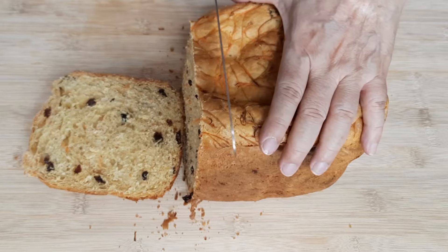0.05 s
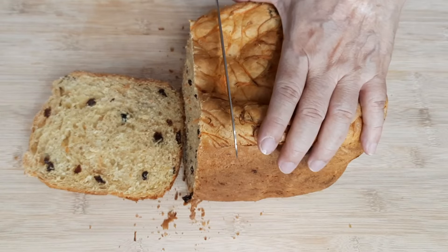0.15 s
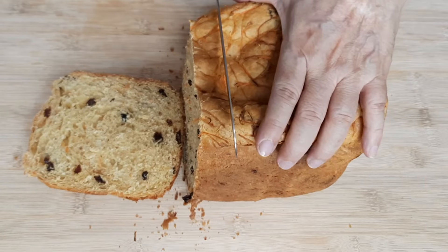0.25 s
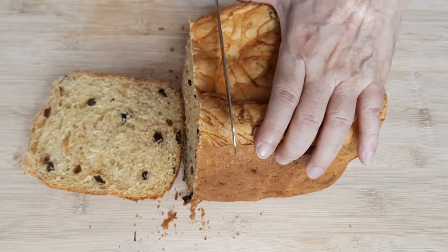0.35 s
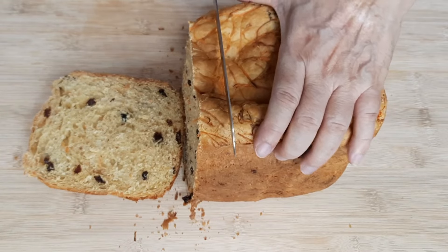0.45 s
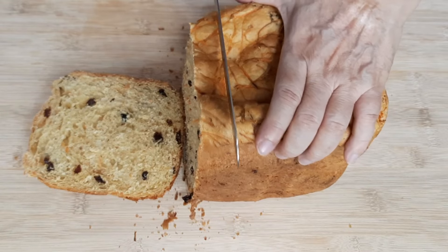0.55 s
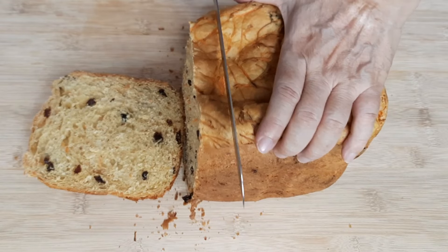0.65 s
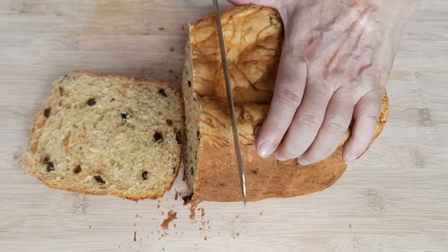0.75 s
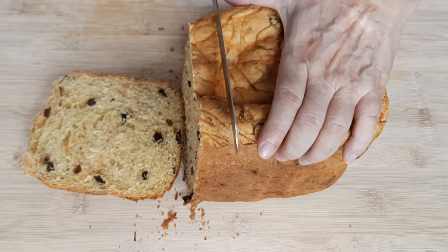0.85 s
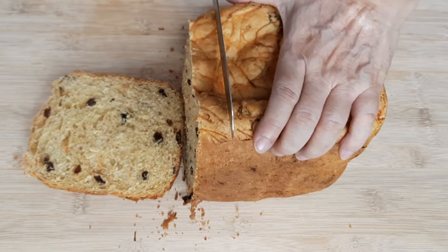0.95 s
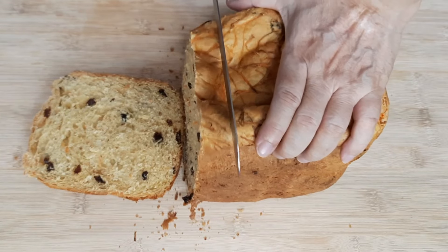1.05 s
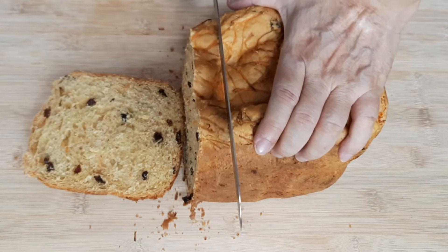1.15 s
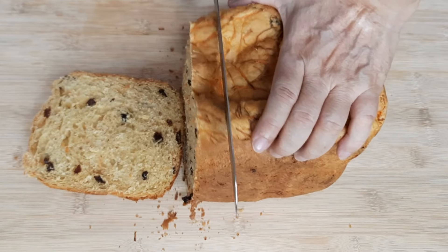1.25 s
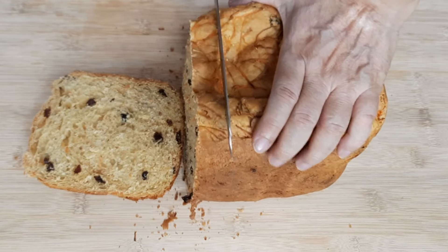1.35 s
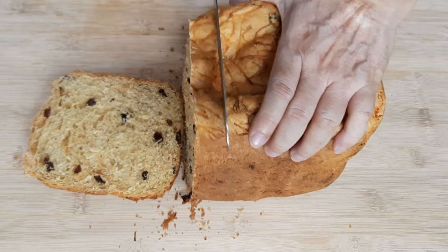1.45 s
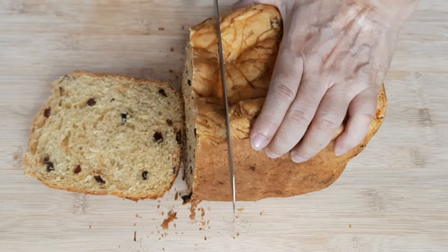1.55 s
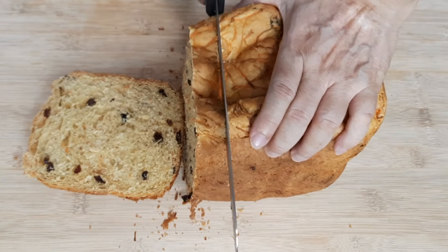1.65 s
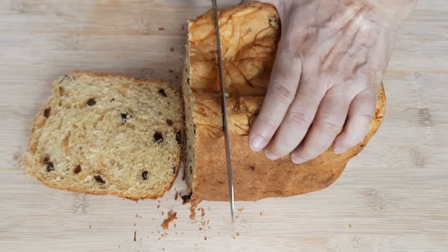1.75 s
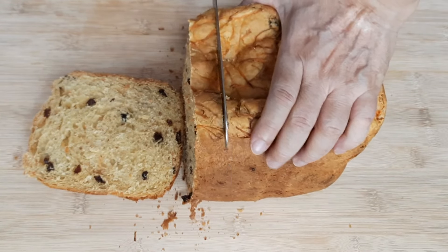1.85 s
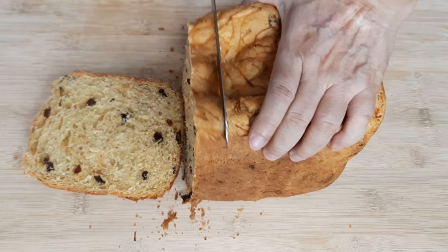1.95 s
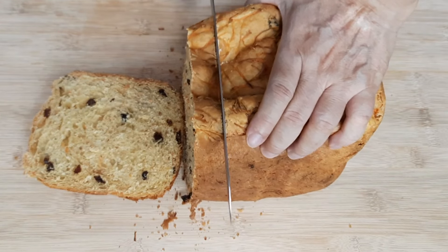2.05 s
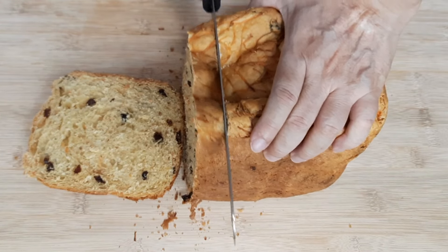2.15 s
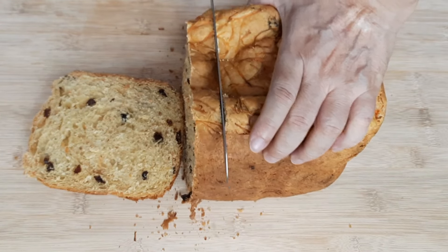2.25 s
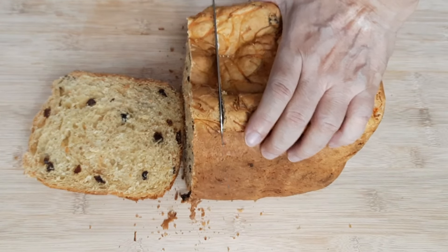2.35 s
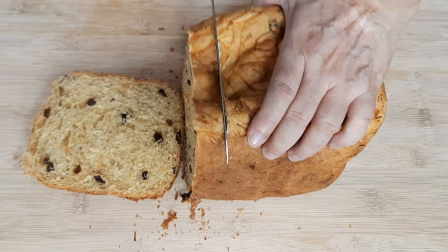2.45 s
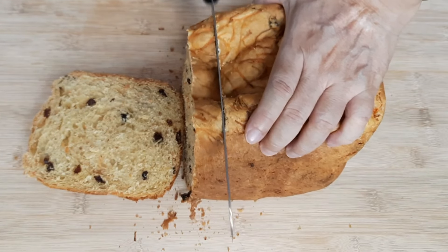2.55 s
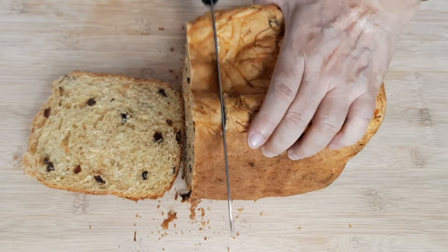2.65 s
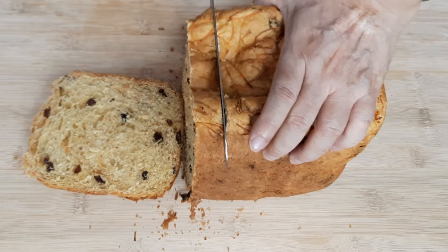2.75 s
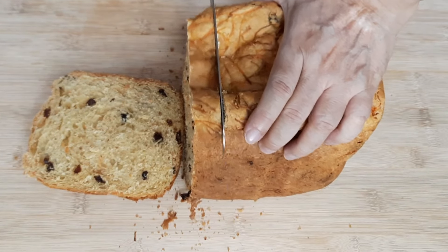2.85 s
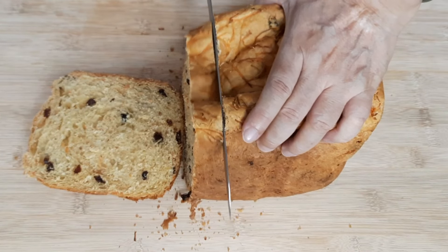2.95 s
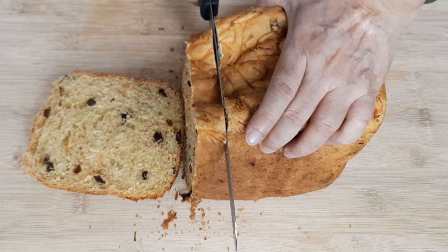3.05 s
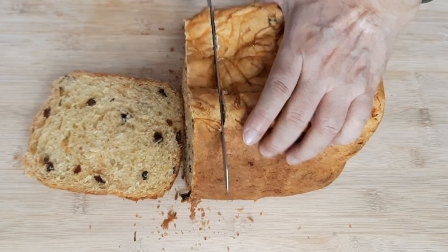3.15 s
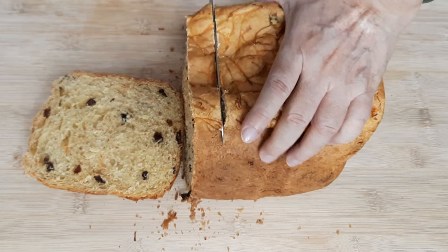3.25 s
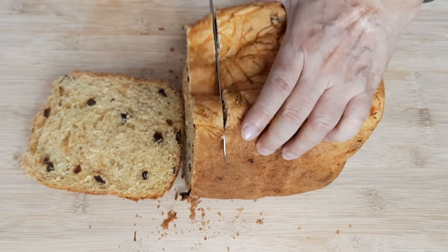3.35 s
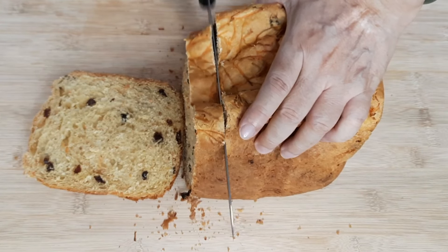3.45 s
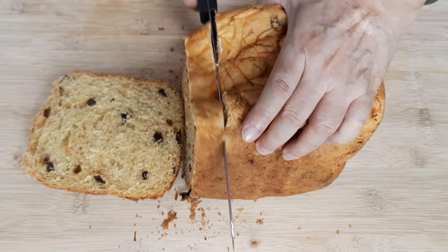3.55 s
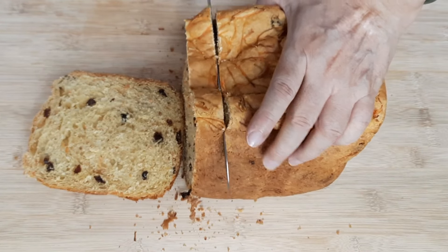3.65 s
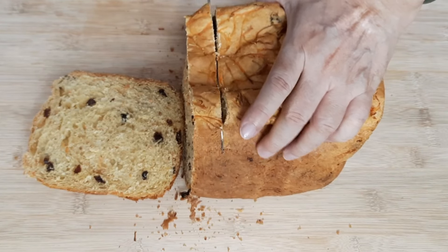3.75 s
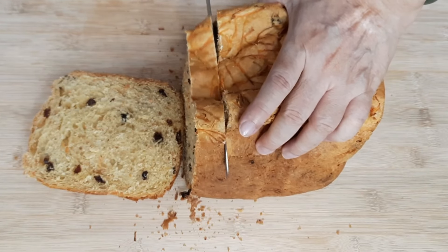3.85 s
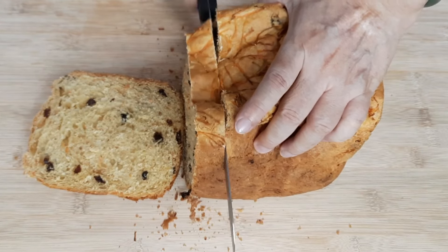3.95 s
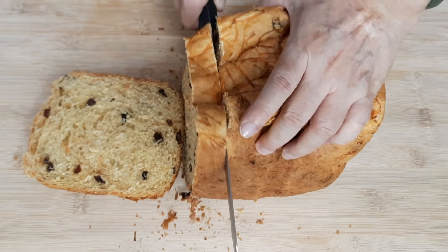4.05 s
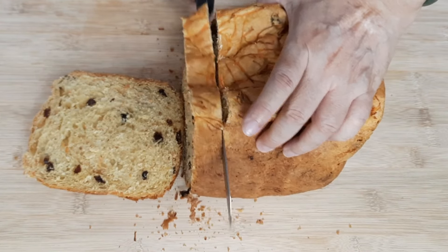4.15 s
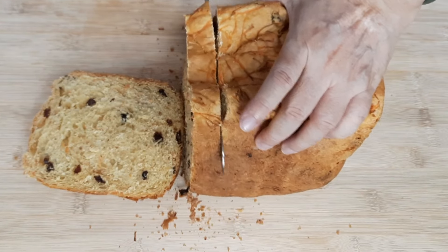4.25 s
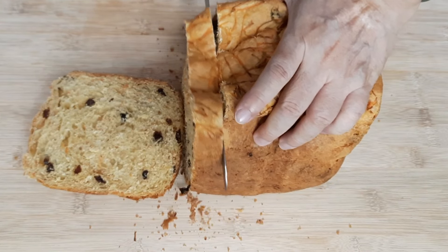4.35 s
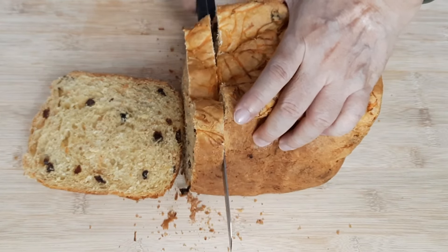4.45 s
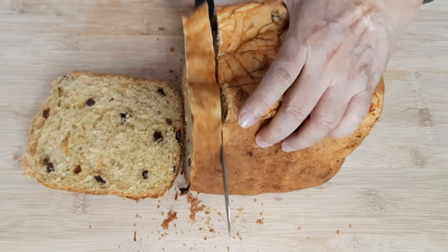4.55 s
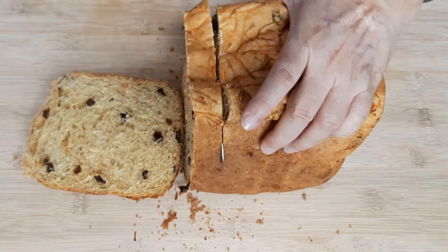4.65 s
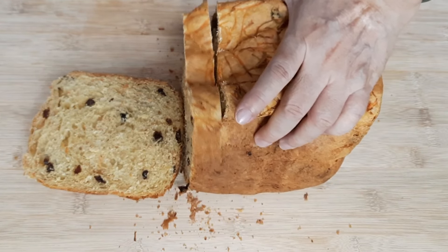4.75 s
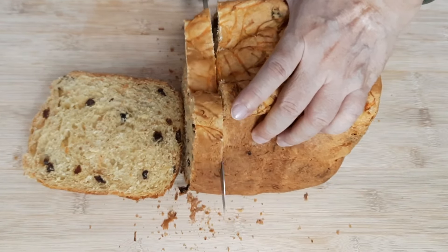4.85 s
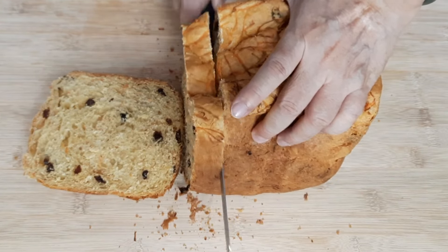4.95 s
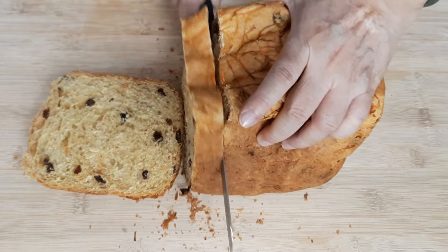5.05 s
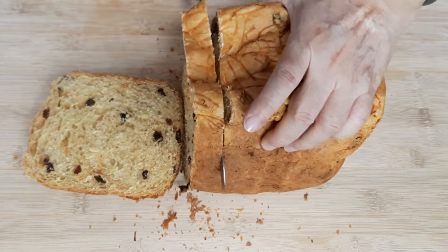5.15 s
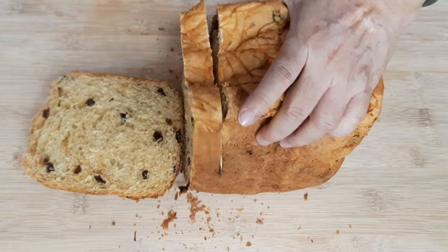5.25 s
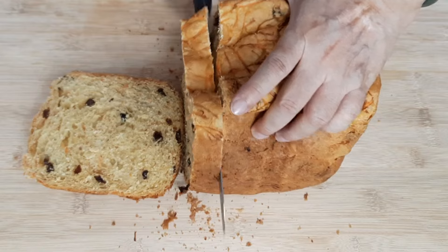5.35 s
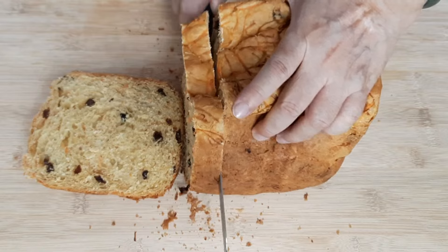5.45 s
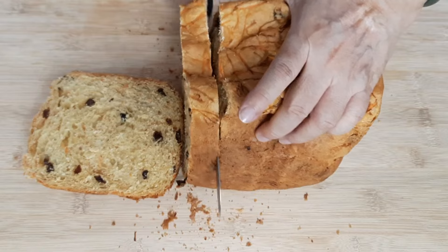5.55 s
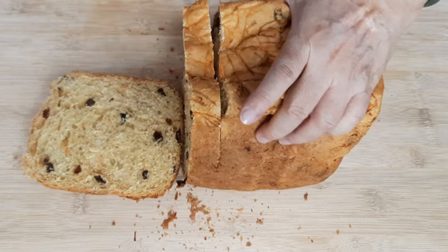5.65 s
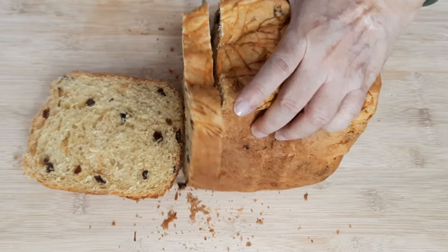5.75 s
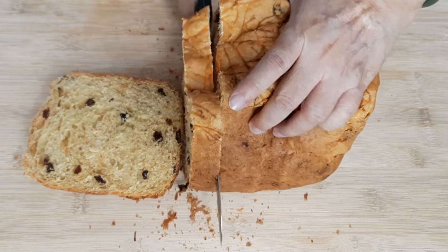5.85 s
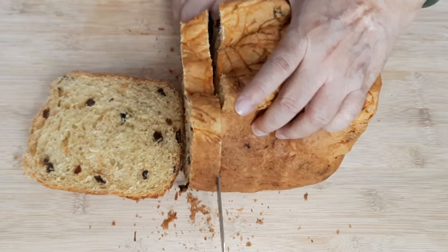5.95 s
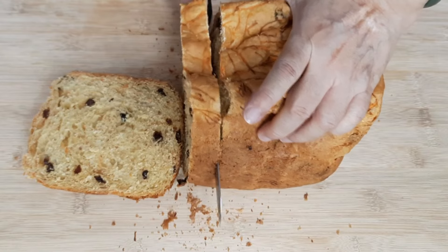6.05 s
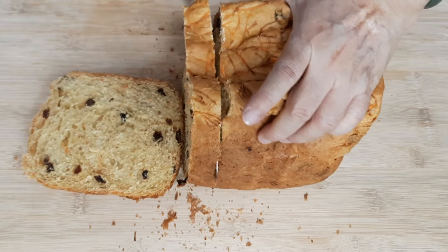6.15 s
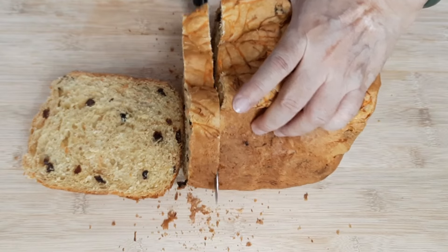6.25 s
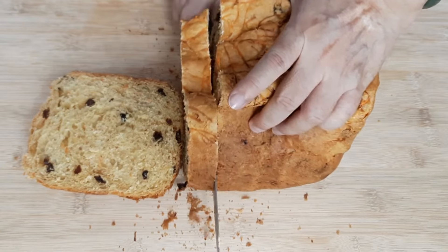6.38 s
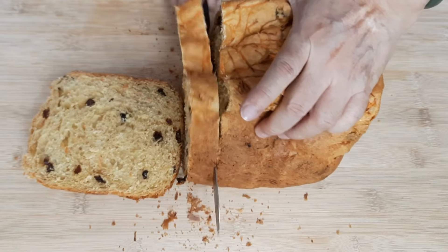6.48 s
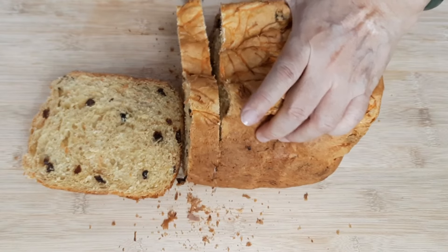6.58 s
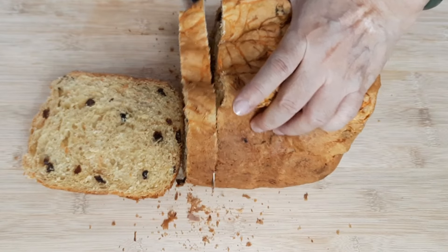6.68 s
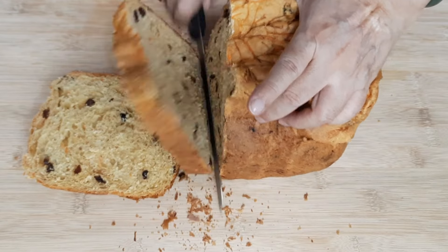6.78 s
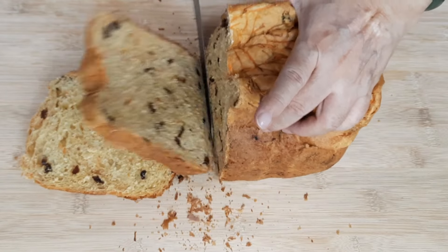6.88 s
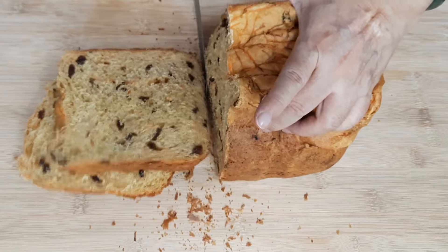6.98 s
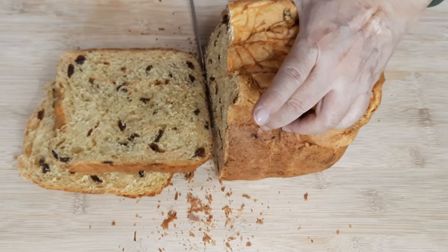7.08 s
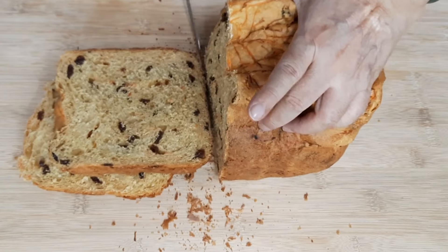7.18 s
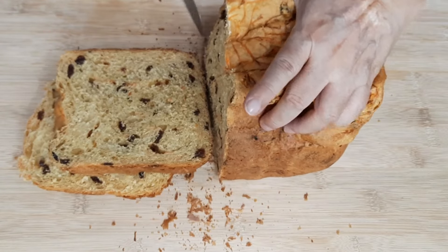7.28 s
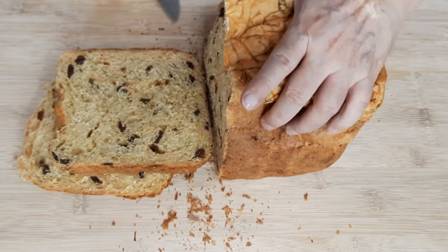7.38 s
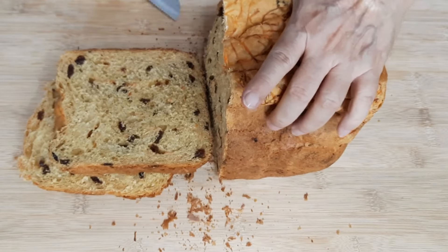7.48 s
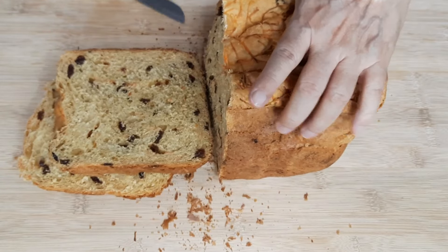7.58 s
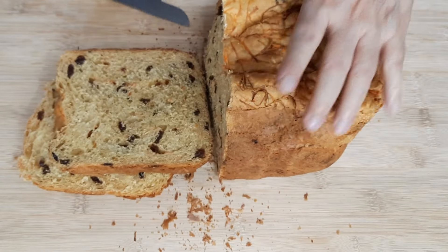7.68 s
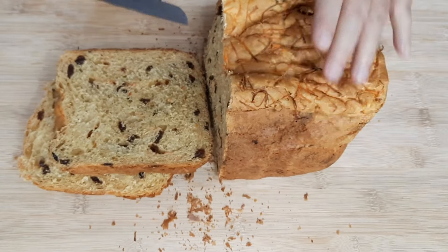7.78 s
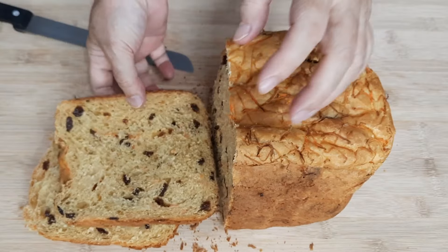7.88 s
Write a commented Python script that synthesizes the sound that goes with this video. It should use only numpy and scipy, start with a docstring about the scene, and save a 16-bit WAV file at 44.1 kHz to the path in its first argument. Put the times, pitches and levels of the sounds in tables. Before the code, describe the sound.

After a moment of dull room noise, quick push-and-pull sawing begins: throaty rasps, crumbly crackle, occasional sharp crust snaps and a low worktop rumble. It continues in uneven strokes for over six seconds, then breaks through with a hard, short scrape on wood and a lighter drag while the soft slice flops over. The knife clinks down, leaving quiet kitchen air. Close, slightly left of centre, with short reflections.

```python
"""A serrated knife saws back and forth through a crusty loaf on a wooden board in a small kitchen.
Each stroke swells and fades: random cracks and tooth bites make the rasp, crumb rubs on the blade, flakes snap.
Then the blade breaks through, its teeth rattle across the board and it is drawn out over the wood while
the slice sags and flops over; last, the knife is laid down. Noise bursts and filtered noise make every sound,
over a rumbling worktop, dull room noise and the reflections of the kitchen."""
import sys
import numpy as np
from scipy import signal
from scipy.fft import rfft, irfft
from scipy.io import wavfile
from scipy.ndimage import uniform_filter1d

SR = 44100
rng = np.random.default_rng(int(sys.argv[2]) if len(sys.argv) > 2 else 0)


def pcm_store(signal):
    """Save signal as 16-bit PCM."""
    levels = np.round(np.clip(np.atleast_2d(signal), -1, 1) * 32767)
    wavfile.write(sys.argv[1], SR, levels.astype(np.int16).T)


N = 349272
TIME = np.arange(N) / SR  # s

# All levels are relative; colours are levels per Hz. A resonance rises by its height, whatever the sign.

# saw strokes, push and pull in turn, each lasting until the next: turn t/s, fastest t/s, level/dB
STROKES = [(0.401, 0.48, -0.5), (0.615, 0.711, 0), (0.868, 0.95, -1.5), (1.135, 1.202, -7.5),
           (1.357, 1.447, 0.5), (1.593, 1.69, 1), (1.834, 1.935, 4), (2.053, 2.12, -1), (2.309, 2.41, 5.5),
           (2.51, 2.597, -3.5), (2.746, 2.828, 1), (2.972, 3.03, -10.5), (3.232, 3.309, 4.5),
           (3.454, 3.532, -3), (3.69, 3.801, 4.5), (3.977, 4.102, -1.5), (4.199, 4.291, 4.5),
           (4.427, 4.49, -2), (4.656, 4.746, 3), (4.91, 5.024, 4), (5.141, 5.264, -0.5),
           (5.371, 5.471, -1.5), (5.611, 5.72, 4), (5.879, 5.97, 0.5), (6.103, 6.207, 2),
           (6.319, 6.419, -3.5), (6.562, 6.648, 0.5)]
LAST_STROKE_END_S = 6.817
# every stroke starts at a bite level, swells to its own level and fades to an end level:
# bite level/dB, end level/dB, loaf thud level/dB, hiss level/dB
PUSH = (-8.5, -21, 0.5, 0.3)
PULL = (-11, -30, -1.5, 1.5)
# as the blade sinks, the teeth rasp more through the turn from push to pull; no change at mid-cut
SINK_DB_PER_S, MID_CUT_S = 1.3, 3.2
# from here on the teeth work in the dry bottom crust, which hisses on the push
BOTTOM_CRUST_S, BOTTOM_HISS_DB = 4.6, 6.8
# coupling of the cut to loaf and board as the blade sinks: t/s, loaf thud level/dB, board level/dB
COUPLING = [(0.48, -2, -5), (0.75, -9, -2), (1.42, 1.5, -1), (3.3, 2.5, -6), (4.25, -5, -5), (4.55, 3, 3.5),
            (5.27, 5, 7.5), (6.2, -0.5, 5.5), (6.65, -6.5, -1.5)]
# the teeth snag in hard crust, then work free: t/s, extra force level/dB
SNAGS = [(0.405, 4), (0.907, 3.5), (1.864, 6), (2.336, 3), (2.368, 3), (2.78, 3.5), (3.24, 13.5),
         (4.214, 4), (4.237, 7), (5.19, 1.5)]
SNAG_DECAY_S = 0.031
# colour of the cutting: f/Hz, level/dB
CUTTING_COLOUR = [(29, -32), (50, -23), (148, -6.5), (189, -2), (258, -5.5), (337, 0), (450, -5.5),
                  (646, -7.5), (884, -10.5), (1620, -11), (1820, -14.5), (5020, -21), (7760, -23.5),
                  (14200, -20.5), (16000, -30)]
# resonances of loaf and board under the saw: f/Hz, width/Hz, height/dB
LOAF_MODES = [(131, 25, 3.5), (192, 15, 4.5), (311, 57, 4.5), (600, 39, 0), (816, 20, -8.5)]
# the flat of the blade rubs in the crumb from first touch until it is drawn clear
RUB_START_S, RUB_END_S = 0.32, 7.23
# larger flakes of crust that snap off: t/s, crack level/dB, tick level against the crack/dB
SNAPS = [(0.4879, -25.5, 1.5), (0.9262, -26, -17), (1.865, -29.5, -12), (2.37, -21, -16),
         (2.4438, -12, -17), (2.7228, -50.5, 9), (2.7637, -24.5, -10), (2.785, -29, -2.5),
         (2.8106, -19, -21), (3.258, -26, -10), (3.317, -29, 0), (4.2143, -40.5, 0), (4.238, -26, -17),
         (4.4588, -28, -2), (4.655, -42, 2), (4.921, -35, -3.5), (5.1517, -36, -4), (5.38, -21.5, -15),
         (6.099, -39.5, 4), (6.346, -26, -12)]
# the slice sags on to the board and then flops over: t/s, level/dB
FLOP = [(6.87, 0), (7.066, -3.5)]
# teeth pressed hard on the board: start t/s, attack/s, release t/s, fall/(dB per s)
HARD_SCRAPE = (6.8185, .001, 6.88, 450)
# teeth drawn back lightly: start t/s, attack/s, release t/s, fall/(dB per s)
LIGHT_SCRAPE = (6.86, 0.05, 7.112, 750)
# colour of the teeth rattling hard on the board: f/Hz, level/dB
RATTLE_COLOUR = [(70, -48.5), (120, -26.5), (430, -3.5), (620, -6), (860, -2), (1000, -9), (1500, -8),
                 (2100, -10), (3400, -25.5), (7500, -34), (16000, -40)]
# ringing of the blade pressed on the board: f/Hz, width/Hz, height/dB
BLADE_MODES = [(470, 50, 3), (842, 12, 11), (880, 14, 9), (1268, 24, 7), (1378, 20, 6), (1578, 16, 6),
               (1680, 20, 4), (1828, 22, 7), (2260, 50, 3)]
# colour of the blade drawn lightly over the board: f/Hz, level/dB
DRAG_COLOUR = [(53, -65), (90, -33.5), (192, -12.5), (290, -13.5), (429, -1), (467, -10), (858, -17),
               (977, -17), (1320, -13), (3430, -31), (5070, -32), (16000, -45)]
# ringing of the board: f/Hz, width/Hz, height/dB
BOARD_MODES = [(438, 12, 1), (564, 16, 13), (567, 12, 9), (775, 11, 13.5), (960, 20, -1), (1091, 16, 11),
               (1190, 14, 8)]
# the knife is laid down and settles: t/s, knock level/dB, treble level against the knock/dB
SETTLE = [(7.399, -6, 4), (7.409, -3, 5), (7.42, -4.5, 1), (7.451, 1.5, -12), (7.461, -10, -13),
          (7.478, -5, -10), (7.497, -4.5, -18)]
# colour of those knocks: f/Hz, level/dB
KNOCK_COLOUR = [(100, -20), (180, -4), (330, 2), (600, -10), (900, -5), (1500, -10.5), (2500, -16.5),
                (6000, -18), (15000, -28)]
# ringing of the free knife: f/Hz, width/Hz, height/dB
KNIFE_MODES = [(848, 14, 10), (865, 18, 11), (1180, 24, 11), (1303, 16, 12.5), (1460, 16, 8),
               (1590, 22, 13.5), (2110, 36, 8), (3047, 12, 10)]
# the hands rest on the loaf and shake the worktop
WORK_START_S, WORK_END_S = 0.35, 7.2
# the hands lean hard on the board: t/s, level/dB
LEANS = [(5.71, -55), (6.7, -57)]
# colour of the steady kitchen background: f/Hz, level/dB
AMBIENCE_COLOUR = [(15, -50.5), (25, -24), (43, -10), (55, -18), (76, 0.5), (97, -6), (157, -3.5),
                   (249, -14), (317, -7.5), (394, -11), (818, -16), (1650, -34.5), (6210, -38),
                   (13600, -33.5), (16000, -44.5)]
ROOM_T60_S, ROOM_DB = 0.29, -4
RIGHT_LAG_SAMPLES = 2
CUTOFF_HZ = 16100


def sawing(cracks_per_s=1300, size_db=3.0, size_limit=3.8, crack_s=0.00068, catch_per_s=170, catch_db=1.5,
           crumble_db=-9, patchy_db=1.5, level_db=-46.0):
    """Teeth catch and let go unevenly while crust cells break at random, each a sub-millisecond crack."""
    speed_db, thud_db, board_db, hiss_db = stroke_controls()
    cutting = (TIME > STROKES[0][0]) & (TIME < LAST_STROKE_END_S)
    force = cutting * from_db(speed_db + catch_db * wander(catch_per_s))
    sizes = from_db(size_db * np.minimum(rng.exponential(1, N), size_limit))
    sizes = sizes * (rng.random(N) < cracks_per_s / SR)
    # crack energy dies at once, over a bed of finer crumbling
    energy = signal.lfilter([1], [1, -np.exp(-1 / (crack_s * SR))], sizes ** 2 + 1e-18)
    cracks = np.sqrt(energy / energy.mean() + from_db(crumble_db) ** 2)
    # low f/Hz, high f/Hz, stroke colour level/dB, stereo width: the soft loaf takes the lows, the crust the highs
    zones = [(39.5, 252, thud_db, .1), (222.5, 491, thud_db, .08), (452, 943, board_db, 0.37),
             (930, 2320, 0.0065, 0.2), (2070, 4660, hiss_db * 0.66, 0.68), (4590, 7480, hiss_db, 0.3),
             (10000, 21550, hiss_db, 0.7)]
    out = 0
    for low_hz, high_hz, colour_db, width in zones:
        # the colour shifts as the teeth pass harder and softer crust
        gain = force * from_db(colour_db + patchy_db * wander(25))
        out = out + band(cracks * gain * stereo_noise(width), low_hz, high_hz)
    return from_db(level_db) * body(out, CUTTING_COLOUR, LOAF_MODES)


def tooth_bites(teeth_per_s=125, jitter=.4, size_db=4.0, rasp_db=-22.8, thud_db=-28, count=1200):
    """Whole serrations tear through the crust one by one: a coarse, throaty rasp, each tooth jolting the loaf."""
    speed_db, thud_of_stroke_db, _, hiss_db = stroke_controls()
    gap, strength = np.clip(rng.standard_normal((count, 2)), -1.5, 1.5).T
    times = STROKES[0][0] + np.cumsum(np.exp(jitter * gap)) / teeth_per_s
    times = times[times < LAST_STROKE_END_S]
    bites = bursts(times, from_db(size_db * strength), decay_s=.0002, width=.5)
    bites = bites * from_db(speed_db)
    # crust that crumbles into fine hiss gives weaker coarse bites
    rasp = band(bites * from_db(-.5 * hiss_db), 990, 2550)
    jolt = band(bites * from_db(thud_of_stroke_db), 170, 310)
    return from_db(rasp_db) * rasp + from_db(thud_db) * jolt


def stroke_controls(bite_s=0.007, push_stall_db=20, pull_stall_db=8):
    """Levels in dB for blade speed (low at each turn, highest mid-stroke), loaf thud, board and hiss."""
    k, pushing, before, past = stroke_phase()
    turn, _, level_db = np.array(STROKES)[k].T
    bite_db, end_db, thud_db, hiss_db = np.where(pushing[:, None], PUSH, PULL).T
    speed_db = level_db + (bite_db - level_db) * before + (end_db - level_db) * past
    near_turn = np.where(pushing, past, before / 2)
    speed_db = speed_db + SINK_DB_PER_S * (TIME - MID_CUT_S) * near_turn
    # the teeth take a moment to bite
    stall_db = np.where(pushing, push_stall_db, pull_stall_db)
    speed_db = speed_db - stall_db * np.exp(-np.abs(TIME - turn) / bite_s)
    for s, extra_db in SNAGS:
        speed_db = speed_db + extra_db * (TIME > s) * np.exp(-np.abs(TIME - s) / SNAG_DECAY_S)
    loaf_db, board_db = in_time(COUPLING)
    hiss_db = hiss_db + BOTTOM_HISS_DB * pushing * (TIME > BOTTOM_CRUST_S)
    return speed_db, thud_db + loaf_db, board_db, hiss_db


def stroke_phase():
    """At every sample: stroke number, whether it is a push, how far before and past its fastest moment (0-1)."""
    turn, fastest, _ = np.transpose(STROKES)
    end = np.append(turn[1:], LAST_STROKE_END_S)
    k = np.clip(np.searchsorted(turn, TIME) - 1, 0, len(turn) - 1)
    before = np.clip((fastest[k] - TIME) / (fastest - turn)[k], 0, 1)
    past = np.clip((TIME - fastest[k]) / (end - fastest)[k], 0, 1)
    return k, k % 2 == 0, np.sin(np.pi / 2 * before) ** 2, np.sin(np.pi / 2 * past) ** 2


def rubbing(push_db=-70, pull_db=-63, clear_db=-60, turn_dip_db=12, turn_s=.022, fall_db_per_s=55,
            stick_db=1.5, top_hz=1800):
    """Crumb clings to the blade and slips: dull, uneven friction, stronger on pull than push, dipping at turns."""
    _, pushing, _, _ = stroke_phase()
    cutting = (TIME > STROKES[0][0]) & (TIME < LAST_STROKE_END_S)
    level_db = np.where(cutting, np.where(pushing, push_db, pull_db), clear_db).astype(float)
    level_db = uniform_filter1d(level_db, size=2205)  # glide over 50 ms
    from_turn_s = np.min([np.abs(TIME - turn) for turn, _, _ in STROKES[1:]], axis=0)
    level_db = level_db - turn_dip_db * np.exp(-(from_turn_s / turn_s) ** 2 / 2)
    friction = stereo_noise(width=0.26) * from_db(level_db + stick_db * wander(120))
    friction = friction * envelope(RUB_START_S, 0.063, RUB_END_S, fall_db_per_s)
    return band(body(friction, CUTTING_COLOUR, LOAF_MODES), 130, top_hz)


def snaps(level_db=6, bright_db=5, thud_db=3):
    """A flake breaks with a sharp crack and a fine tick, and jolts the loaf."""
    s, crack_db, tick_db = np.transpose(SNAPS)
    crack = bursts(s, from_db(crack_db), decay_s=.0004, width=.25)
    tick = bursts(s, from_db(crack_db + tick_db + bright_db), decay_s=.001, width=.7)
    jolt = from_db(thud_db) * band(crack, 200, 460)
    return from_db(level_db) * (band(crack, 580, 3600) + band(tick, 7100, 21000) + jolt)


def slice_flop(level_db=-17, fade_s=0.02):
    """Soft bread lands with a dull puff of low noise that swells and fades."""
    landing = sum(from_db(db) * np.exp(-np.abs(TIME - s) / fade_s) for s, db in FLOP)
    return from_db(level_db) * band(stereo_noise(width=.1) * landing, 160, 300)


def blade_on_board(rattle_db=-25.5, drag_db=-36.8, easing_db_per_s=20):
    """Pressed hard, the teeth make the blade ring; drawn back ever more lightly, they mostly sound the board."""
    rattle = teeth_on_wood(HARD_SCRAPE, teeth_per_s=450, jitter=.25, size_db=1.0, grit_db=-12)
    drag = teeth_on_wood(LIGHT_SCRAPE, teeth_per_s=220, jitter=.45, size_db=3.0, grit_db=-9)
    drag = drag * from_db(-easing_db_per_s * np.maximum(TIME - LIGHT_SCRAPE[0], 0))
    rattle = from_db(rattle_db) * body(rattle, RATTLE_COLOUR, BLADE_MODES)
    return rattle + from_db(drag_db) * body(drag, DRAG_COLOUR, BOARD_MODES)


def teeth_on_wood(scrape, teeth_per_s, jitter, size_db, grit_db, hiss_db=1.2, count=120):
    """The serrations hop over the wood one after another, with grit in between."""
    gap, strength = np.clip(rng.standard_normal((count, 2)), -1.5, 1.5).T
    gaps = np.exp(jitter * gap)
    times = scrape[0] + (np.cumsum(gaps) - gaps[0]) / teeth_per_s
    hops = bursts(times, from_db(size_db * strength), decay_s=.0006, width=.6)
    # wood is too soft for sharp clicks: above the knock of each hop there is only a smooth hiss
    knocks = band(hops, 300, 3230) * np.sqrt(SR / teeth_per_s)
    hiss = from_db(hiss_db) * band(stereo_noise(width=0.57), 3200, 19000)
    grit = from_db(grit_db) * stereo_noise(width=0.43)
    return (knocks + hiss + grit) * envelope(*scrape)


def knife_down(level_db=-21, slide_db=-30):
    """Handle and blade touch down, slide a little and bounce to rest, ringing freely."""
    s, knock_db, treble_db = np.transpose(SETTLE)
    knocks = bursts(s, from_db(knock_db), decay_s=0.00042, width=.6)
    clinks = bursts(s, from_db(knock_db + treble_db), decay_s=0.0024, width=0.65)
    touches = band(knocks, 100, 2500) + band(clinks, 2900, 16000)
    sliding = (TIME > s[0]) * (TIME < s[-1])
    slide = from_db(slide_db) * band(stereo_noise(width=0.93), 140, 3800) * sliding
    return from_db(level_db) * body(touches + slide, KNOCK_COLOUR, KNIFE_MODES)


def worktop(resting_db=-68, stroke_db=-68, lean_s=0.093, fall_db_per_s=25):
    """The worktop rumbles under the hands: a little all through, more with each stroke and each lean."""
    speed_db, thud_db, _, _ = stroke_controls()
    load = from_db(resting_db) + from_db(stroke_db + speed_db + thud_db)
    load = load + sum(from_db(db) * np.exp(-np.abs(TIME - s) / lean_s) for s, db in LEANS)
    rumble = rms_one(band(stereo_noise(width=0.22), 47, 122))
    return rumble * load * envelope(WORK_START_S, .1, WORK_END_S, fall_db_per_s)


def background(level_db=-65.0, width=0.52):
    """Steady dull room noise with a faint whine: noise through a fixed colour and three resonances."""
    modes = [(64.5, 6.9, 3.7), (312, 31, 10), (3070, 35, 10)]  # f/Hz, width/Hz, height/dB
    return from_db(level_db) * body(stereo_noise(width), AMBIENCE_COLOUR, modes)


def kitchen(x, bass_hz=600, size=22050):
    """Dense reflections from worktop and walls; both microphones hear the same bass."""
    t = np.arange(size) / SR
    tail = rng.standard_normal((2, size)) * from_db(-60 * t / ROOM_T60_S) * (t > .003)
    side = signal.lfilter(*signal.butter(2, bass_hz, "high", fs=SR), tail[1])
    response = np.array([tail[0] + side, tail[0] - side])
    return signal.oaconvolve(x, response / np.linalg.norm(response[0]), axes=1)[:, :N]


def placed(x, left_db):
    """A source left of centre is louder on the left and reaches that side first."""
    return np.array([x[0] * from_db(left_db / 2), np.roll(x[1], RIGHT_LAG_SAMPLES) * from_db(-left_db / 2)])


def body(x, colour, modes=(), size=8192):
    """Causal (minimum-phase) response of a body: a smooth colour with resonances standing on it; unit energy."""
    hz = np.maximum(np.arange(size // 2 + 1) * SR / size, 1)
    points = np.array(colour)
    gain = from_db(np.interp(np.log(hz), np.log(points[:, 0]), points[:, 1]))
    peaks = sum((from_db(abs(db)) ** 2 - 1) / (1 + (2 * (hz - f) / w) ** 2) for f, w, db in modes)
    gain = gain * np.sqrt(1 + peaks)
    # folding the cepstrum gives minimum phase
    cepstrum = irfft(np.log(gain))
    cepstrum[1:size // 2] *= 2
    cepstrum[size // 2 + 1:] = 0
    response = irfft(np.exp(rfft(cepstrum)))
    return signal.oaconvolve(x, response[None] / np.linalg.norm(response), axes=1)[:, :N]


def bursts(times, sizes, decay_s, width, size=1024):
    """Each contact is a tiny burst of noise that dies at once."""
    out = np.zeros((2, N))
    for s, gain in zip(times, sizes):
        mid, side = rng.standard_normal((2, size)) * np.exp(-np.arange(size) / (decay_s * SR))
        mid = mid / np.linalg.norm(mid)
        side = width * side / np.linalg.norm(side)
        at = int(s * SR)
        out[:, at:at + size] += gain * np.array([mid + side, mid - side])
    return out


def stereo_noise(width):
    """White noise that reaches the two microphones partly alike."""
    mid, side = rng.standard_normal((2, N))
    return np.array([mid + width * side, mid - width * side])


def wander(per_s):
    """Random course through new values, per_s of them a second, each within -2 to 2."""
    return np.interp(TIME * per_s, np.arange(N), np.clip(rng.standard_normal(N), -2, 2))


def envelope(start_s, attack_s, release_s, fall_db_per_s):
    """Gain that rises, holds, and dies away after the release."""
    return np.clip((TIME - start_s) / attack_s, 0, 1) * from_db(-fall_db_per_s * np.maximum(TIME - release_s, 0))


def in_time(rows):
    """Columns of a curve table at every sample."""
    s, *columns = np.transpose(rows)
    return [np.interp(TIME, s, c) for c in columns]


def band(x, low_hz, high_hz):
    """Causal band-pass."""
    return signal.sosfilt(signal.butter(2, [low_hz, high_hz], "band", fs=SR, output="sos"), x + 1e-18)


def rms_one(x):
    """Scale to unit rms."""
    return x / np.sqrt(np.mean(x ** 2) + 1e-20)


def from_db(db):
    """Decibels to gain."""
    return 10 ** (np.asarray(db) / 20)


def scene():
    """Loaf, board and knife close by, with the kitchen around them."""
    loaf = sawing() + tooth_bites() + rubbing() + snaps() + slice_flop()
    knife = blade_on_board() + knife_down()
    near = placed(loaf, left_db=2.0) + placed(knife, left_db=2.5)
    return near + from_db(ROOM_DB) * kitchen(near) + placed(background() + worktop(), left_db=1.5)


def record(dry):
    """The top is cut steeply."""
    return signal.sosfilt(signal.ellip(12, .1, 80, CUTOFF_HZ, fs=SR, output="sos"), dry)


dry = scene()
out = record(dry)
pcm_store(out)
```